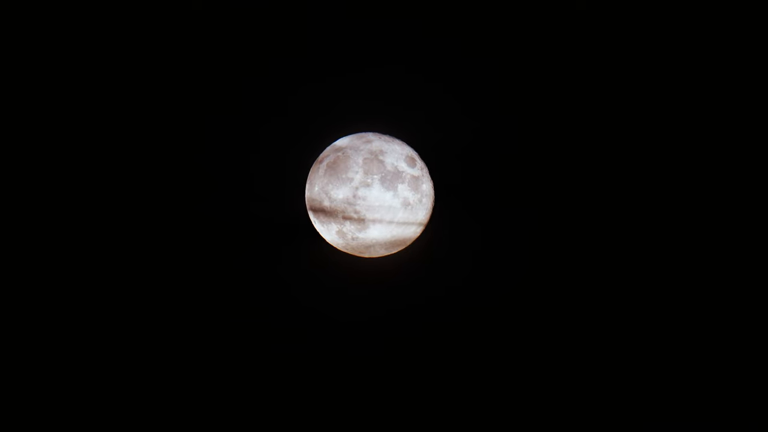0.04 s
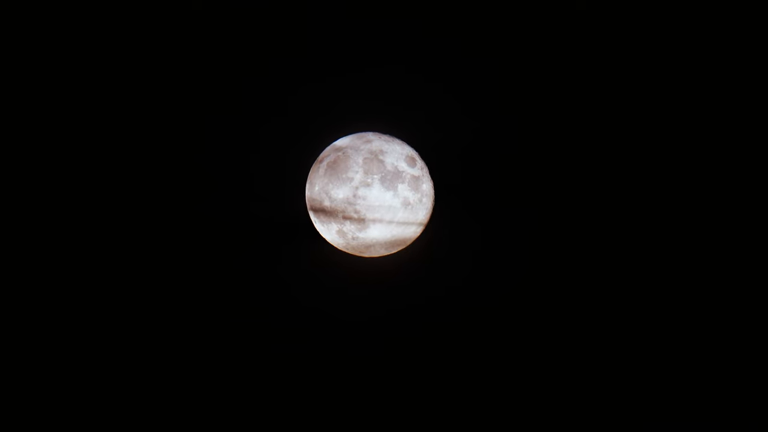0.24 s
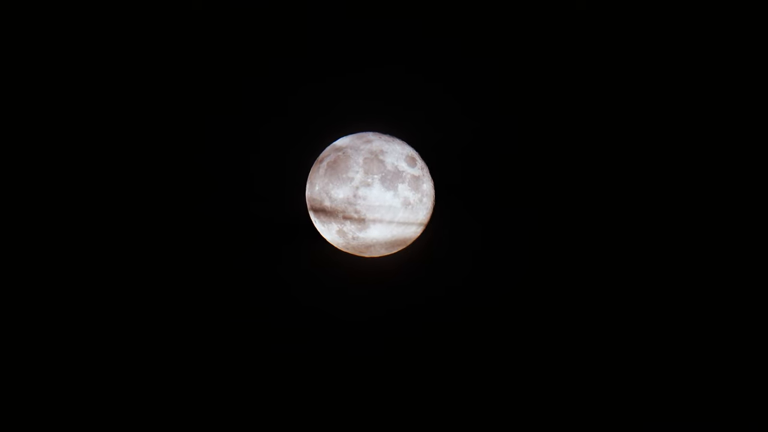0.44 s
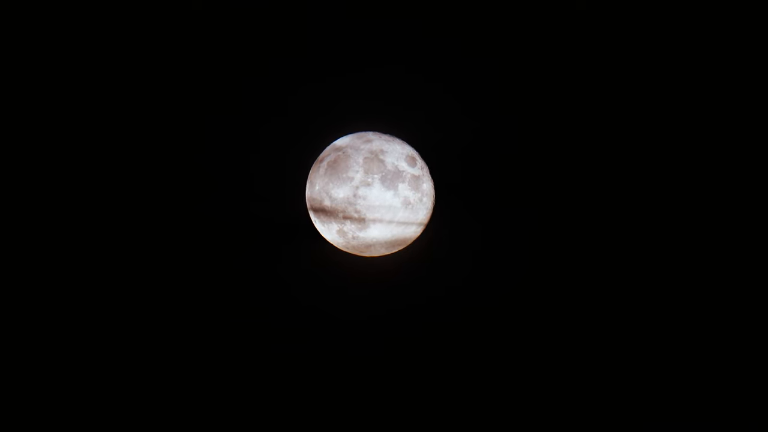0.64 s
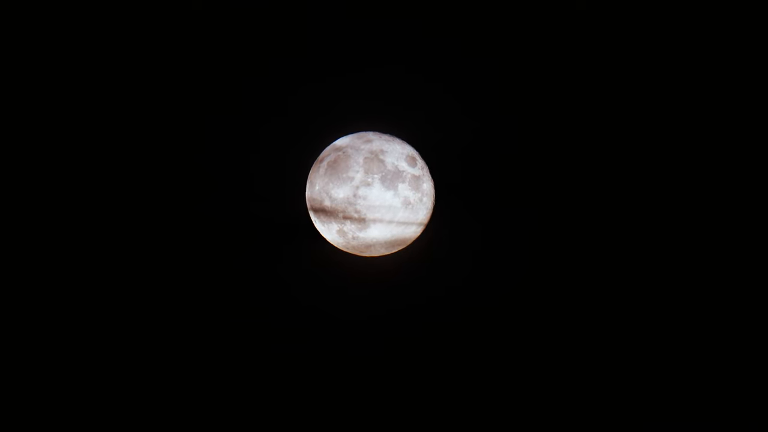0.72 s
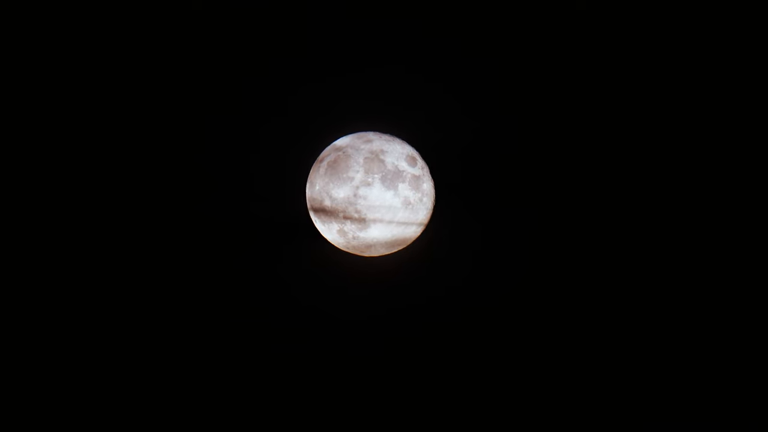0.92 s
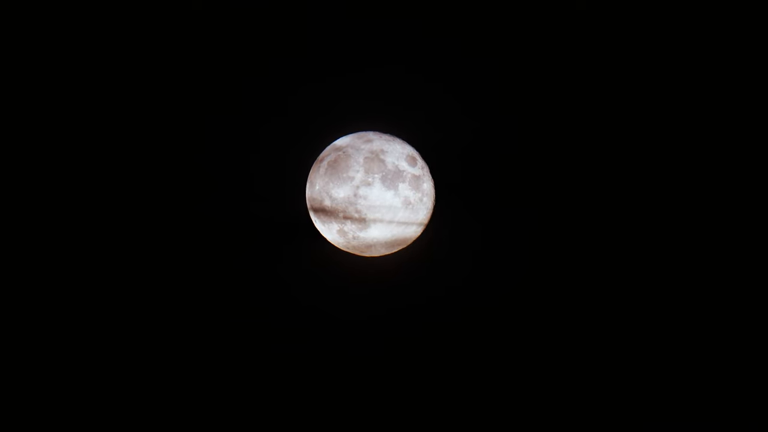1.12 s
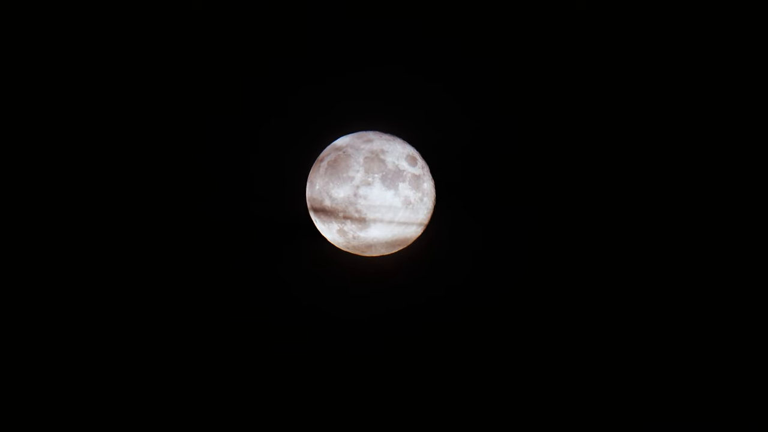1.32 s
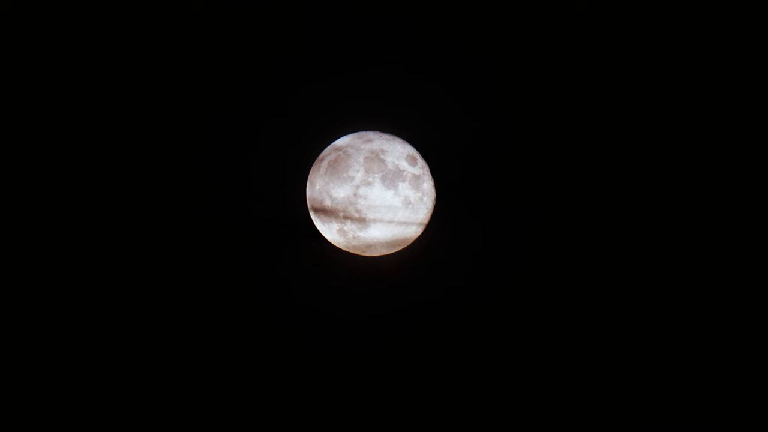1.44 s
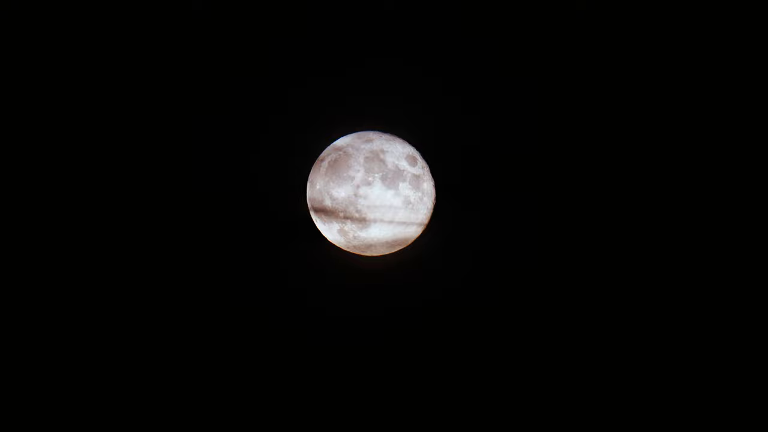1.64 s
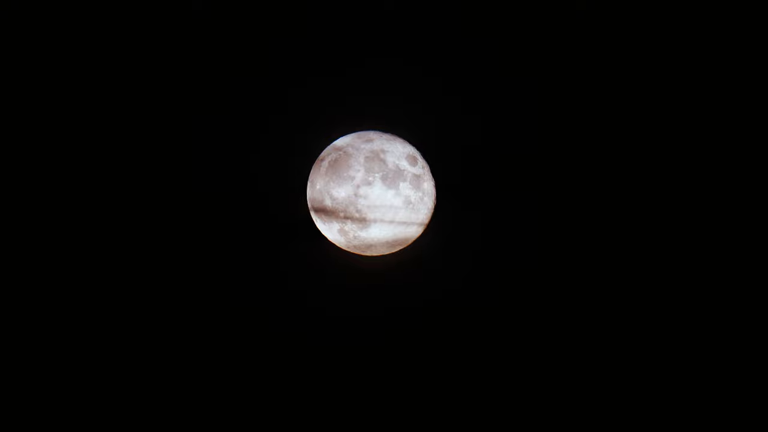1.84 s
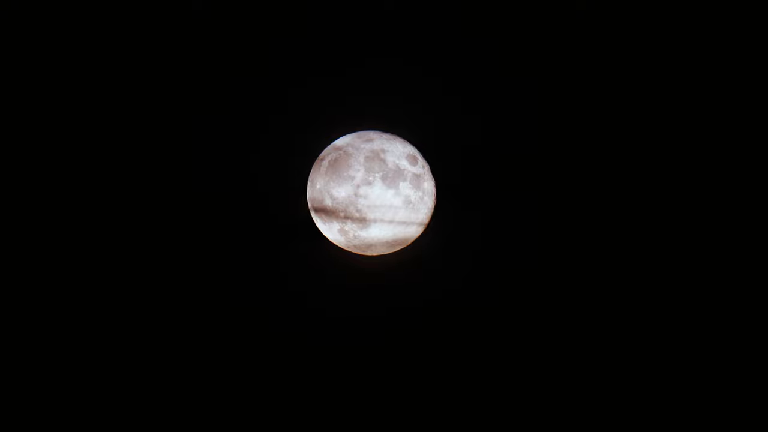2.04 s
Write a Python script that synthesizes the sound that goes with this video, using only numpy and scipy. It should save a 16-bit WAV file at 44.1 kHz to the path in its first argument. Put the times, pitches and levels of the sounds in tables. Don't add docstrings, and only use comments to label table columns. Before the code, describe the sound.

One short, round owl hoot rises quickly and droops, with a faint echo from trees. Quiet insects chirr over soft hiss, then stop; a far bird whistles thinly at the end. Outdoors at night, clean mono pickup.

```python
import sys
import numpy as np
from scipy import signal
from scipy.fft import rfft, irfft
from scipy.io import wavfile
from scipy.ndimage import uniform_filter1d

SR = 44100
rng = np.random.default_rng(int(sys.argv[2]) if len(sys.argv) > 2 else 0)


def bounce(signal):
    frames = np.transpose(np.atleast_2d(signal))
    limited = np.clip(frames, -1, 1)
    pcm = np.round(limited * 32767).astype(np.int16)
    wavfile.write(sys.argv[1], SR, pcm)


def linear_from_db(decibels):
    return 10 ** (np.asarray(decibels, float) / 20)


N = 92610


def level(x, db):
    return x * linear_from_db(db) / np.sqrt(np.mean(x ** 2))


def walk(rate):
    hold = int(SR / rate)
    steps = np.repeat(rng.standard_normal(N // 200), hold)[:N]
    return 1.3 * uniform_filter1d(uniform_filter1d(steps, hold), hold)


def curve(rows, col, t, smooth_s=.014):
    rows = np.array(rows)
    return uniform_filter1d(np.interp(t, rows[:, 0], rows[:, col]), int(smooth_s * SR))


def bump(x, centre, spread):
    return np.exp(-.5 * ((x - centre) / spread) ** 2)


def fade(t, start_s, end_s, edge_s):
    return np.clip(np.minimum(t - start_s, end_s - t) / edge_s + 1, 0, 1) ** 2


def tone(hz):
    return np.sqrt(2) * np.sin(2 * np.pi * np.cumsum(hz) / SR)


def band(x, hz, width_hz):
    f = np.arange(N // 2 + 1) * SR / N
    return irfft(rfft(x) * bump(f, hz, width_hz), N)


def night(t):
    # frequency in Hz, level in dB per Hz.
    hiss_colour = [(130, -24.5), (250, -10), (450, 0), (1000, -12.5), (3000, -26), (4000, -28.5),
                   (7000, -42), (15900, -41)]
    f = np.maximum(np.arange(N // 2 + 1) * SR / N, 1)
    hz, db = np.array(hiss_colour).T
    bass_cut = 1 / np.sqrt(1 + (247 / f) ** 8)
    colour = linear_from_db(np.interp(np.log(f), np.log(hz), db)) * bass_cut
    noise = rfft(rng.standard_normal(N)) * colour
    swell_db = .4 * walk(1.34)
    hiss = 0
    for step in range(17):
        share = np.clip(1 - np.abs(2 * np.log2(f / 90) - step), 0, 1)
        flicker_db = .9 * walk(8.96)
        hiss = hiss + irfft(noise * share, N) * linear_from_db(swell_db + flicker_db)
    rumble = level(band(rng.standard_normal(N), 90, 60), -85)
    hum = linear_from_db(-72.5) * tone(np.full(N, 49.8))
    return level(hiss, -44) + rumble + hum


def insects(t):
    # time in seconds, effort in dB, leading pitch in Hz.
    chorus = [
        (0, -55, 2356),
        (.15, -55, 2225),
        (.3, -52.5, 2130),
        (.6, -49.5, 2063),
        (.8, -50.5, 2050),
        (.96, -47.5, 2280),
        (1.1, -50, 2290),
        (1.25, -51, 2247),
        (1.3, -58.5, 2220),
        (1.33, -97, 2263),
    ]
    # pitch in Hz, level in dB.
    singers = [(1868, -59), (1976, -58.5), (2046, -71), (2153, -66), (2191, -64), (2288, -69.5),
               (2342, -58.5), (2460, -62), (2530, -71.5), (2665, -66.5)]
    throb_db, throb_rate, waver = 3, 30, .011
    rasp_hz, rasp_width_hz, rasp_db = 2187, 760, -1.5
    pulse_rate, pulse_ring = 120, .3
    octave_hz, octave_width_hz, octave_db, octave_grows_db = 4100, 330, -11, 11.5
    lead_hz = curve(chorus, 2, t)
    low, high = 0, 0
    for hz, db in singers:
        pitch = hz * (1 + waver * walk(30))
        near_lead = bump(hz, lead_hz, 260)
        strength = linear_from_db(db + throb_db * walk(throb_rate)) * near_lead
        low = low + strength * tone(pitch)
        high = high + strength * tone(2 * pitch) * linear_from_db(2 * throb_db * walk(160))
    pulse_phase = np.cumsum(pulse_rate * (1 + .1 * walk(25))) / SR % 1
    rasp = np.exp(-pulse_phase / pulse_ring) * rng.standard_normal(N)
    low = level(low, 0) + level(band(rasp, rasp_hz, rasp_width_hz / 2), rasp_db)
    high = level(band(level(high, 0) + level(rasp, 9), octave_hz, octave_width_hz), 0)
    growth = np.clip((t - .25) / .25, 0, 1)
    high_db = octave_db + octave_grows_db * (growth - 1)
    return linear_from_db(curve(chorus, 1, t)) * (low + linear_from_db(high_db) * high) / np.sqrt(2)


def owl(t):
    # time in seconds, level in dB, overtone level in dB.
    hoot_shape = [
        (.194, -46, -12),
        (.21, -23.5, -3),
        (.235, -12, 0),
        (.265, -9.3, 0),
        (.3, -8.1, 0),
        (.4, -10.2, 0),
        (.48, -15.3, 0),
        (.55, -27.5, -5),
        (.577, -48, -18),
    ]
    # multiple of the pitch, level in dB, brightest moment in seconds, spread in seconds.
    overtones = [(2, -46, .27, .15), (2, -46, .49, .04), (3, -44, .25, .1), (3, -41, .47, .07),
                 (4, -54.5, .36, .2), (5, -58, .34, .1), (6, -62, .44, .09), (7, -58.5, .34, .085),
                 (8, -65, .28, .05), (8, -60, .43, .05), (9, -62.5, .42, .09), (10, -65, .44, .06),
                 (11, -68, .43, .06), (12, -66, .52, .02), (12, -77, .33, .04), (13, -64, .48, .027),
                 (15, -75, .545, .009), (14, -68, .358, .02), (16, -79, .445, .015)]
    start_s, end_s = .192, .578
    top_hz, droop_hz_per_s = 456.9, 74.5
    rise_hz, rise_s, sag_hz, sag_s = 172.5, .0326, 133.6, .0525
    held = np.clip(t, start_s, end_s)
    rise = rise_hz * np.exp((start_s - held) / rise_s)
    sag = sag_hz * np.exp((held - end_s) / sag_s)
    hz = top_hz - rise - sag - droop_hz_per_s * (held - start_s)
    low_rush = level(band(rng.standard_normal(N), 120, 53), -61)
    hoot = linear_from_db(curve(hoot_shape, 1, t)) * (tone(hz) + low_rush)
    overtone_db = curve(hoot_shape, 2, t)
    for multiple, db, at_s, spread_s in overtones:
        shimmer_db = 1.5 * walk(45)
        hoot = hoot + bump(t, at_s, spread_s) * linear_from_db(db + overtone_db + shimmer_db) * tone(multiple * hz)
    return hoot * fade(t, hoot_shape[0][0], hoot_shape[-1][0], .006)


def wood(x, t):
    # arrival in seconds, spread in seconds, level in dB.
    echoes = [
        (.588, .013, -28.5),
        (.633, .009, -26),
        (.7, .025, -35),
        (.81, .02, -30),
    ]
    wash_db, wash_gap_s, wash_t60_s = -41, .03, .8
    scatter = rng.standard_normal(N) * linear_from_db(-60 * t / wash_t60_s) * (t > wash_gap_s)
    response = scatter * linear_from_db(wash_db) / np.sqrt(np.sum(scatter ** 2))
    wash = signal.fftconvolve(x, response)[:N]
    flutter = sum(linear_from_db(db) * bump(t, at_s, spread_s) for at_s, spread_s, db in echoes)
    return wash + flutter * np.roll(x, int(.265 * SR))


def bird(t):
    # time in seconds, pitch in Hz, level in dB.
    whistles = [
        [(1.498, 3950, -66), (1.515, 3920, -61), (1.535, 4000, -58.5), (1.555, 3800, -60), (1.57, 3700, -77),
         (1.595, 3690, -64), (1.607, 3720, -70)],
        [(1.68, 3860, -70), (1.705, 4100, -64), (1.725, 4260, -66), (1.748, 4610, -60), (1.775, 4650, -67),
         (1.8, 4690, -72), (1.82, 4670, -66)],
    ]
    smooth_s = .005
    song = 0
    for rows in whistles:
        whistle = linear_from_db(curve(rows, 2, t, smooth_s)) * tone(curve(rows, 1, t, smooth_s))
        song = song + whistle * fade(t, rows[0][0], rows[-1][0], .006)
    trill_s, trill_len_s = 1.865, .17
    trill = level(band(rng.standard_normal(N), 4030, 100), -70)
    return song + trill * fade(t, trill_s, trill_s + trill_len_s, .012)


def scene():
    t = np.arange(N) / SR
    hoot = owl(t)
    return (night(t) + insects(t) + hoot + wood(hoot, t) + bird(t))[None]


def band_limit(x):
    return signal.sosfilt(signal.butter(12, 16070, fs=SR, output="sos"), x)


def record(dry):
    return band_limit(dry)


dry = scene()
out = record(dry)
bounce(out)
```